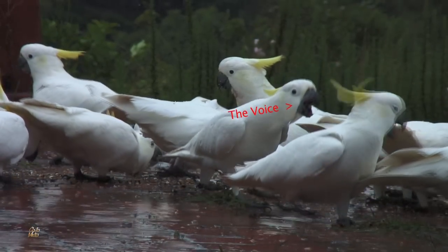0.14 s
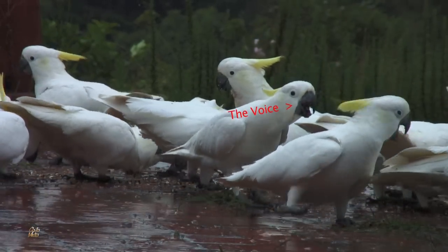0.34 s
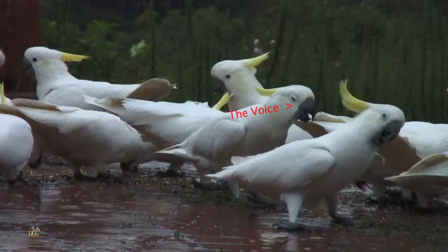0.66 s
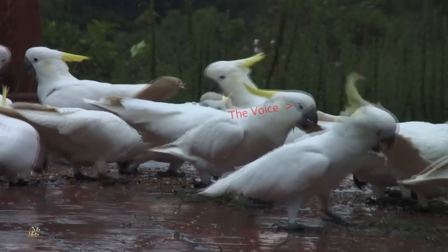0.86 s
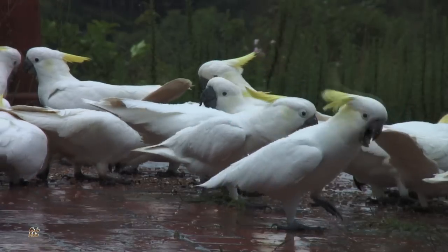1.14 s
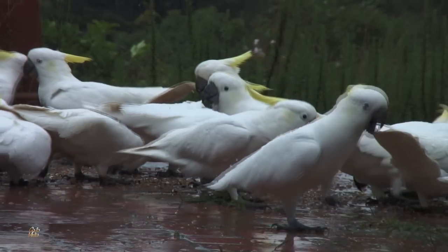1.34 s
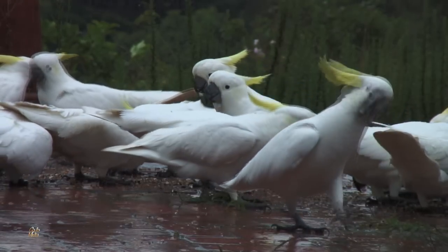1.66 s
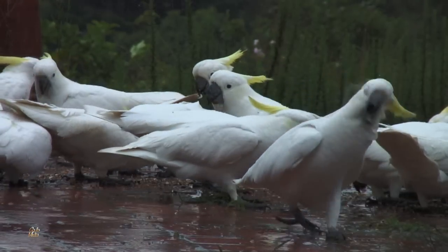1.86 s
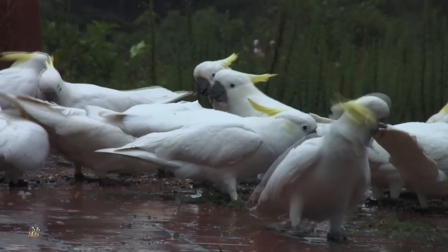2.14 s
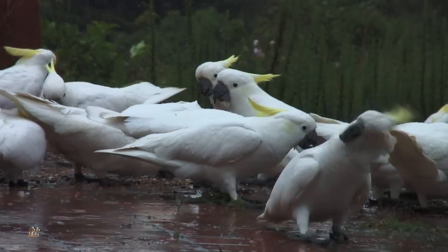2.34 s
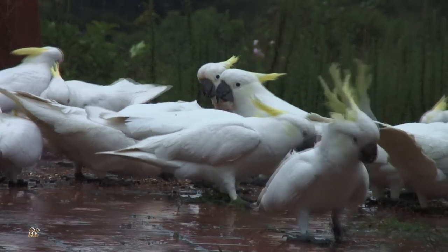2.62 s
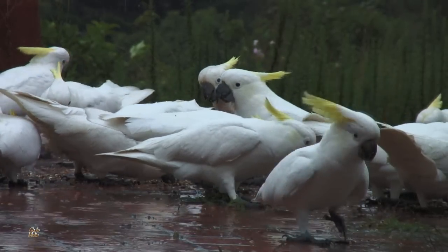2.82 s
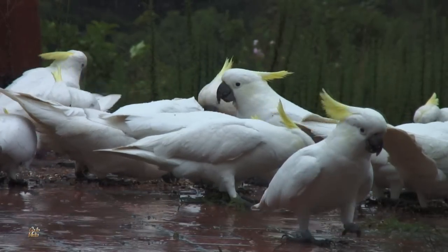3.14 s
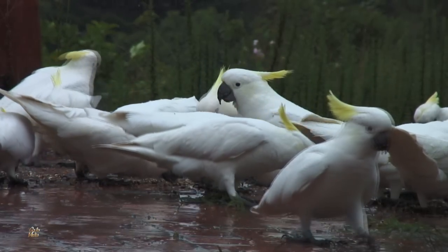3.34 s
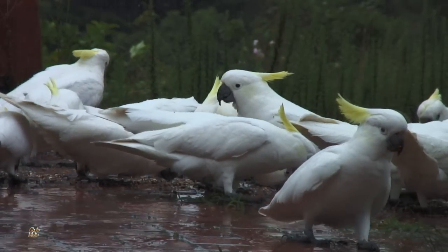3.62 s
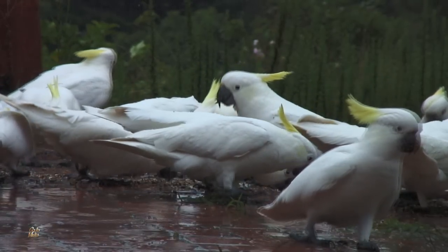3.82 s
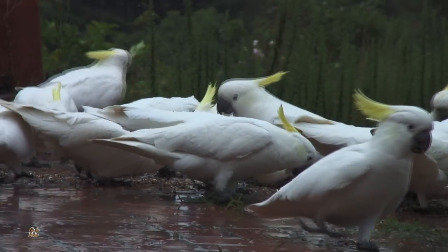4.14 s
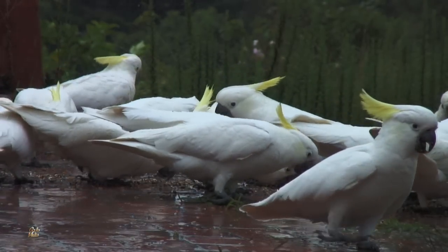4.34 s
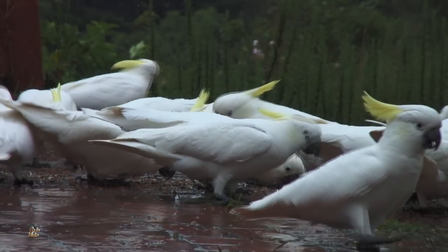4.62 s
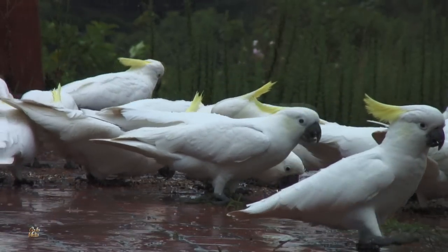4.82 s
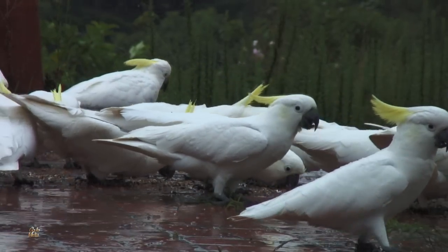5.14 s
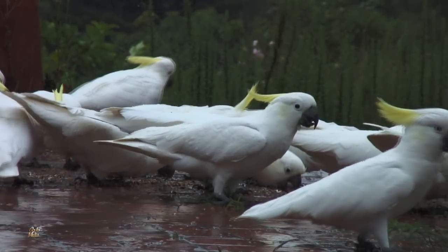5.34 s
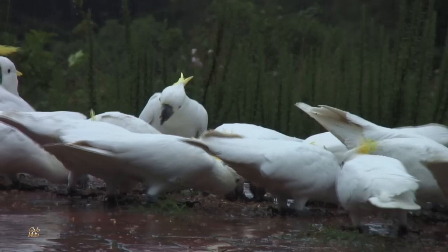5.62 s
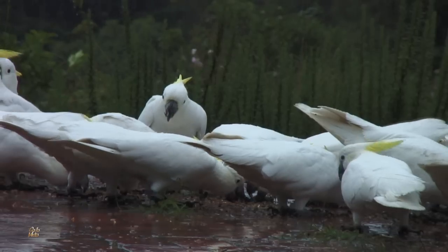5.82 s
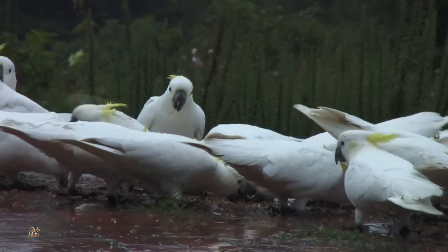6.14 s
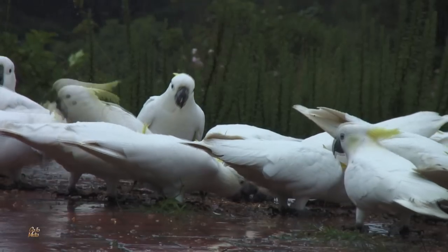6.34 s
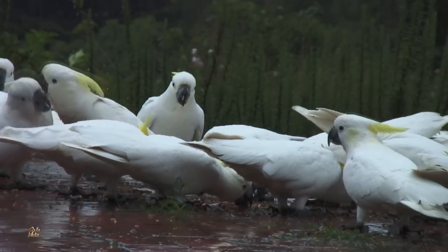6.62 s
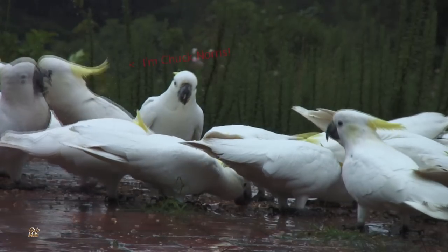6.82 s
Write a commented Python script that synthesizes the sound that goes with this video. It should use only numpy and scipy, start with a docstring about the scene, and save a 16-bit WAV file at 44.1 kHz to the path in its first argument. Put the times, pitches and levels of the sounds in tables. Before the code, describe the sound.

Harsh bursts of cockatoo screeching, squeals and thin whistles come thick at first, then sparser, over faint outdoor air and a low hum.

```python
"""Cockatoos squabbling over food

Cockatoos quarrel on wet paving in the centre; a second layer of cockatoos is heard in the left channel
only. Slapping membranes and gusts of air ring each bird's throat in a harsh rasp. In a squeal, a thin
whistle drops, breaks into a rattle and settles on a nasal note. Short peeps come in between, and low
thumps go with the loudest rasps. Behind them are faint whines, drips, outdoor hush and a low hum."""
import sys
import numpy as np
from scipy import signal
from scipy.fft import rfft, irfft, next_fast_len
from scipy.io import wavfile
from scipy.ndimage import uniform_filter1d

SR = 44100
rng = np.random.default_rng(int(sys.argv[2]) if len(sys.argv) > 2 else 0)


def transcribe(signal):
    """Save signal, clipped to [-1, 1], as a 16-bit WAV file at the path in sys.argv[1]."""
    frames = np.atleast_2d(signal).T
    limited = np.clip(frames, -1, 1)
    pcm = np.round(limited * 32767).astype(np.int16)
    wavfile.write(sys.argv[1], SR, pcm)


N = 307377
TIME = np.arange(N) / SR

# The tone colours of a rasp's body, its shrill band and outdoor air. Each row: frequency in Hz, level in dB.
BODY_COLOUR = [(70, -60.5), (210, -26), (450, -16), (750, -9), (1200, -9), (1560, -14), (1880, 0),
               (2780, -1), (3200, -10), (3800, -32), (6000, -80.5)]
SHRILL_COLOUR = [(1500, -31.5), (2700, -1), (3150, -10), (3480, 0), (3750, -1), (4050, -1), (4550, -5),
                 (5200, -14.5), (7000, -65.5)]
AIR_COLOUR = [(15, -60), (25, -33), (76, -28.5), (141, -15), (180, -13), (335, -6.5), (384, -7), (936, -6),
              (1020, -4.5), (1130, -2.5), (1230, -8), (1440, -6), (9570, -28), (14800, -36.5),
              (16000, -104)]


def amp(db):
    """Turns decibels into a number to multiply by."""
    return 10 ** (np.asarray(db) / 20)


def unit(x):
    """Scales a signal to an average strength (rms) of 1."""
    return x / np.sqrt(np.mean(x ** 2) + 1e-20)


def steady(x, size=1300):
    """Holds the strength of a voice at 1 while keeping its single pulses."""
    return x / np.sqrt(abs(uniform_filter1d(x ** 2, size)) + 1e-12)


def look_up(points, hz):
    """Reads between the rows of a frequency table, giving each octave equal room."""
    f, value = np.transpose(points)
    return np.interp(np.log(hz + 1), np.log(f + 1), value)


def add(mix, start_s, sound):
    """Mixes a sound in, with softened ends."""
    count = sound.shape[-1]
    softened = sound * signal.windows.tukey(count, min(1, 160 / count))
    part = mix[..., max(0, round(start_s * SR)):][..., :count]
    part += softened[..., :part.shape[-1]]


def wander(count, hz):
    """A smooth random wobble of strength 1, no faster than about hz."""
    size = next_fast_len(count + SR // 4)
    f = np.fft.rfftfreq(size, 1 / SR)
    spectrum = rfft(rng.standard_normal(size)) / (1 + (f / hz) ** 4)
    return unit(irfft(spectrum, size))[:count]


def colour(x, points, size=2048):
    """Filters a sound to follow a table of (Hz, dB), never ringing ahead of it."""
    log_gain = np.log(amp(look_up(points, abs(np.fft.fftfreq(size, 1 / SR)))))
    taps = np.fft.ifft(np.exp(np.conj(signal.hilbert(log_gain)))).real
    return signal.oaconvolve(x, taps[:size // 2])[:len(x)]


def resonate(x, hz, width_hz):
    """A resonance: lets through the sound near hz, which may move."""
    turn = np.exp(2j * np.pi * np.cumsum(hz * np.ones(len(x))) / SR)
    decay = np.exp(-np.pi * width_hz / SR)
    return 2 * (turn * signal.lfilter([1 - decay], [1, -decay], x / turn)).real


def envelope(length, attack_s, rise_db, release_db_per_s, change_db=0, arch_db=0):
    """A call rises, holds, then fades by 35 dB. Gives seconds, progress from 0 to 1, and level in dB."""
    t = np.arange(0, length + 35 / release_db_per_s, 1 / SR)
    progress = np.minimum(t / length, 1)
    attack = -rise_db * np.maximum(1 - t / attack_s, 0)
    hold = change_db * (progress - .5) + arch_db * (np.sin(np.pi * progress) - 2 / np.pi)
    return t, progress, attack + hold - release_db_per_s * np.maximum(t - length, 0)


def slaps(count, rate_hz, jitter, spread_db):
    """Uneven slaps of the membranes in a bird's voice box, as clicks."""
    turns = np.cumsum(rate_hz * np.exp(jitter * wander(count, rate_hz))) / SR
    return np.diff(np.floor(turns), prepend=-1) * amp(spread_db * wander(count, rate_hz))


def puffs(clicks, decay_s):
    """The gust of air that dies away after each slap."""
    return unit(signal.lfilter([1], [1, -np.exp(-1 / (decay_s * SR))], clicks))


def rasp(length, attack_s, effort_db, change_db, low_hz, main_hz, glide, tone_db, shrill_db, treble_db):
    """Slaps and gusts of air ring a throat whose resonances move with the beak and quaver."""
    # The colour of the treble. Each row: frequency in Hz, level in dB.
    treble_colour = [(3000, -7), (4400, 1), (5100, -3.5), (6100, 1.5), (7000, -9), (7800, -1), (8700, -15),
                     (9500, -3), (10400, -10.5), (11400, -7), (12400, -22), (13500, -23), (16000, -35)]
    t, progress, db = envelope(length, attack_s, rise_db=20, release_db_per_s=380,
                               change_db=change_db, arch_db=1.5)
    clicks = slaps(len(t), rate_hz=235, jitter=.45, spread_db=-.5)
    air = unit((puffs(clicks, decay_s=.0023) + 1) * rng.standard_normal(len(t)))  # 1 is a steady leak
    drive = unit(clicks) + amp(-1) * air
    slide = 1 + glide * (progress - .5)
    tuning = slide + .045 * wander(len(t), 33)
    body = colour(drive, BODY_COLOUR)
    body = (body + amp(8) * resonate(body, main_hz * tuning, 200)
            + amp(-4) * resonate(body, .7 * main_hz * tuning, 200))
    beak_shut = np.exp(-t / .04)  # until the beak opens, the rasp is throatier and duller
    tone = resonate(resonate(drive, low_hz * tuning, 140), low_hz * slide, 280)
    tone = amp(tone_db - 3.5 + 5 * beak_shut) * steady(tone)
    hiss = unit(clicks) + amp(4) * air  # higher up, the rushing air outweighs the slaps
    shrill = amp(shrill_db - 1) * steady(colour(hiss, SHRILL_COLOUR))
    build_db = 2.5 * (progress - .5) + 1.8 * wander(len(t), 40)  # the treble grows and flickers
    treble = amp(treble_db - 1 + build_db) * steady(colour(hiss, treble_colour))
    slack = amp(-.15 * db)  # as effort drops, the other parts gain on the body
    voice = steady(body, size=800) + slack * (tone + amp(-8 * beak_shut) * (shrill + treble))
    return amp(effort_db - 1 + db) * bounce(voice)


def bounce(x):
    """Quick echoes off the paving and nearby birds cut fine ripples into the tone colour."""
    # Each row: delay in seconds, gain.
    echoes = [(.0034, 0.11), (.0071, 0.18), (0.0122, -0.18)]
    return x + sum(gain * np.pad(x, (round(delay * SR), 0))[:len(x)] for delay, gain in echoes)


def squeal(length, attack_s, rattle_s, peak_db, change_db, settled_hz, piercing_db, release_db_per_s):
    """A nasal note: at first its pitch scatters and the membranes rattle, then it settles and clears."""
    # The throat's resonances. Each row: frequency in Hz, width in Hz, level in dB.
    throat = [(1393, 230, -5), (1680, 130, -6.5), (2660, 320, -1), (3223, 280, 3), (3500, 250, -8),
              (4810, 310, -11), (6020, 370, -22), (7850, 470, -23.5), (9370, 530, -24.5)]
    # Ripples in the treble. Each row: frequency in Hz, level in dB.
    ripples = [(4000, 0), (4500, -4), (5200, 1), (5900, -4), (6500, 0), (7200, -5), (7900, 0), (8700, -6),
               (9800, -2), (11500, -1), (13000, -6), (16000, -15)]
    t, _, db = envelope(length, attack_s, rise_db=12, release_db_per_s=release_db_per_s,
                        change_db=change_db, arch_db=-1.5)
    settled = .5 + .5 * np.tanh((t - rattle_s) / .018)
    rough = .85 - .75 * settled
    sag = .65 * np.maximum(rattle_s - t, 0)  # the pitch sinks into the note, then lifts a little
    lift = np.clip(.4 * (t - rattle_s), 0, .015)
    quaver = .009 * wander(len(t), 55.6)
    scatter = .086 * rough * wander(len(t), 397)
    turns = np.cumsum(settled_hz * (1 + sag + lift + quaver + scatter)) / SR
    note = unit(sum(np.cos(2 * np.pi * k * turns) for k in range(1, 23)))
    rattle = puffs(slaps(len(t), rate_hz=240, jitter=.43, spread_db=2.5), decay_s=.0025)
    breath = amp(-5) * rough * rng.standard_normal(len(t))
    drive = (note + breath) * (1 - rough + rough * rattle)
    beak = 1 + .035 * wander(len(t), 12)
    voice = np.zeros(len(t))
    for hz, width, gain_db in throat:
        ring = resonate(resonate(drive, hz * beak, 2 * width), hz * beak, 2 * width)
        voice += amp(gain_db + piercing_db * (3000 < hz < 4500)) * ring
    return amp(peak_db + db) * steady(colour(voice, ripples))


def thumps():
    """Uneven low bumps under the hardest rasps, mostly on the left."""
    # Each row: start in seconds, end in seconds, left level in dB, right level in dB relative to it.
    bursts = [(0, 0.36, -42, -28), (1.48, 1.575, -39.5, -8), (4.545, 4.622, -45, -11),
              (6.55, 6.78, -39.5, -10)]
    bass_colour = [(8, 7), (25, 0), (50, .5), (100, -11), (250, -15.5), (600, -47)]  # Hz, dB
    out = np.zeros((2, N))
    for start, end, db, right_db in bursts:
        count = len(np.arange(start, end, 1 / SR))
        bumps = colour(wander(count, 400), bass_colour, size=8192)
        bumps = unit(bumps * signal.windows.tukey(count, .25))
        add(out, start, amp([[db], [db + right_db]]) * bumps)
    return out


def hum(hz=150, trim_db=-1):
    """A low hum on one pitch, slowly changing in level."""
    # Each row: time in seconds, level in dB before the trim.
    levels = [(0, -58), (2.75, -55.5), (3.2, -60.5), (4.4, -65), (6.97, -62)]
    db = np.interp(TIME, *np.transpose(levels)) + trim_db
    return np.sqrt(2) * amp(db) * np.sin(2 * np.pi * hz * TIME)


def hush(air_db=-41.82, flock_db=-53, drips_db=-63, drips_per_s=120):
    """Outdoor air, far-off rasping birds and small drips on the paving."""
    air_gain = amp(air_db + .5 * wander(N, 12))
    air = unit(colour(rng.standard_normal(N), AIR_COLOUR, size=8192))
    far_birds = np.zeros(N)
    for hz in (880, 1120, 2400):
        band = resonate(rng.standard_normal(N), hz * (1 + .2 * wander(N, 16)), 240)
        far_birds += resonate(band, hz, 500) * amp(1.6 * wander(N, 12))
    landings = rng.random(N) < drips_per_s / SR
    drops = landings * amp(3 * np.minimum(rng.exponential(1, N), 3))
    drips = colour(drops, [(300, -21), (1500, -29), (4000, 50), (10000, -51), (16000, -32)])
    return air_gain * air + amp(flock_db) * unit(far_birds) + amp(drips_db) * unit(drips)


def left_hush(rasping_db=-5):
    """The second layer's background: air and farther birds rasping, gone after about 4 seconds."""
    # Each row: time in seconds, level of the air in dB.
    levels = [(0, -46.5), (.85, -39.5), (1.1, -60), (2.2, -41.5), (2.7, -48.5), (3.5, -44), (3.75, -59),
              (4.2, -112)]
    air = unit(colour(rng.standard_normal(N), AIR_COLOUR, size=8192))
    body = colour(rng.standard_normal(N) * amp(3.8 * wander(N, 120)), BODY_COLOUR)
    shrill = colour(rng.standard_normal(N), SHRILL_COLOUR)
    return amp(np.interp(TIME, *np.transpose(levels))) * (air + amp(rasping_db) * unit(body + shrill))


def whistle(hz, db, overtone_db, firm_db=-20):
    """A gliding tone with weak overtones, shaky when blown softly and pure when blown hard."""
    shaky = 1 / (1 + amp(db - firm_db) ** 2)
    phase = 2 * np.pi * np.cumsum(hz * (1 + .017 * shaky * wander(len(hz), 215))) / SR
    tone = sum(amp(k * overtone_db) * np.sin((k + 1) * phase) for k in range(4))
    flutter_db = 3 * shaky * wander(len(hz), 86)
    return np.sqrt(2) * amp(db + flutter_db) * tone


def swoop(hold_s, drop_s, held_hz, held_db, drop_db, sag_hz_per_s=1400, break_hz=3060, surge_s=.008):
    """A thin whistle sags and swells, then surges and drops to the pitch where the voice breaks."""
    t = np.arange(0, hold_s + drop_s, 1 / SR)
    to_go, since = np.maximum(hold_s - t, 0), np.maximum(t - hold_s, 0)
    hz = held_hz + sag_hz_per_s * to_go + (break_hz - held_hz) * (since / drop_s) ** .7
    db = held_db - 6 * to_go / hold_s + (drop_db - held_db) * np.minimum(since / surge_s, 1)
    return whistle(hz, db, overtone_db=-33)


def peep(length, peak_db, change_db, start_hz, middle_hz, end_hz, overtone_db):
    """A short whistle whose pitch follows one smooth arc."""
    _, progress, db = envelope(length, attack_s=.006, rise_db=10, release_db_per_s=2000,
                               change_db=change_db, arch_db=3)
    arc = np.polyfit([0, .5, 1], [start_hz, middle_hz, end_hz], 2)
    return whistle(np.polyval(arc, progress), peak_db + db, overtone_db)


def whine(length, peak_db, base_hz, upturn):
    """A thin, reedy call from the back of the flock, turning up and swelling at its end."""
    # The level of each harmonic in dB, lowest first.
    harmonics = [1.5, -5, 0, -1.5, -7, -22]
    t, progress, db = envelope(length, attack_s=.025, rise_db=12, release_db_per_s=1500)
    lift = upturn * progress ** 5
    phase = 2 * np.pi * np.cumsum(base_hz * (1 + lift + .0051 * wander(len(t), 90))) / SR
    reed = unit(sum(amp(level) * np.sin(k * phase) for k, level in enumerate(harmonics, 1)))
    flutter_db = 2.5 * wander(len(t), 27)
    return amp(peak_db + db + 50 * lift + flutter_db) * reed


def yard(x, echo_db=-15):
    """Adds scattered echoes from paving, wall and trees; the high treble dies first."""
    # Each row: frequency in Hz, seconds the echoes take to fade by 60 dB.
    fade_times = [(200, 0.21), (1000, 0.32), (3000, 0.4), (8000, 0.2), (15000, 0.05)]
    count = SR * 3 // 4
    echoes = rng.standard_normal(count) * (rng.random(count) < 2000 / SR)
    echoes *= np.arange(count) > .006 * SR  # none in the first 6 ms
    hz, t, bands = signal.stft(echoes, SR, nperseg=256)
    fade = amp(-60 * t / look_up(fade_times, hz)[:, None])
    tail = signal.istft(bands * fade, SR, nperseg=256)[1]
    return x + amp(echo_db) * signal.fftconvolve(x, tail / np.linalg.norm(tail))[:N]


def flock(layer, lowest_hz=150):
    """All calls of one layer, "ahead" (the centre) or "left", with echoes; small throats give no bass."""
    # Each row: layer; start, length and rise time in seconds; effort and its change in dB; low and main
    # resonance in Hz; their glide as a fraction; settings in dB for throaty tone, shrill band and treble.
    rasps = [ ("left", 0, .325, .005, -14.5, -1, 970, 2370, -.1, -21, -8.5, -11.5),
             ("ahead", 0, .105, .012, -20, 0, 1180, 2560, 0, -8, -4, -10.5),
             ("ahead", .565, .065, .022, -25, 1, 1040, 2430, -.02, -5, -4, -15),
             ("ahead", .615, .09, .028, -17, -2, 960, 2650, -.15, -13, -7, -13),
             ("left", .615, .095, .03, -27, -1, 900, 2650, -.03, -10, -2, -14),
             ("ahead", .913, .365, .023, -18.3, -1.5, 890, 2580, .09, -11, -7, -16),
             ("ahead", 1.293, .262, .037, -15.5, -.5, 1060, 2310, .02, -8, -4, -13.5),
             ("left", 1.32, .06, .035, -24, 2, 1020, 2330, .03, -3, -9, -21),
             ("left", 1.365, .1, .04, -17, -3, 980, 2750, -.08, -11, -7, -12),
             ("ahead", 1.55, .195, .02, -22, -2, 1120, 2560, .05, -7, -4, -20),
             ("left", 1.672, .345, .032, -17.5, -2, 860, 2560, .06, -11, -7.5, -15.5),
             ("ahead", 1.755, .06, .02, -28, -4, 900, 1900, -.04, -4, -5, -10),
             ("ahead", 1.86, .07, .03, -28, -2, 1150, 2400, -.05, -9, -1, -13),
             ("ahead", 1.95, .075, .027, -23, -1, 930, 2000, .02, -3, -5, -11),
             ("left", 2.025, .09, .02, -25, 2, 1030, 2300, .05, -2, -1, -10),
             ("left", 2.22, .315, .06, -22.5, 1, 1110, 2560, .1, -3.5, -4, -20),
             ("ahead", 2.27, .15, .06, -38, 0, 1100, 2450, 0, 4, -4, -13),
             ("ahead", 2.54, .075, .03, -30.5, 1, 900, 2030, -.03, -3, -1, -11),
             ("ahead", 2.62, .1, .02, -38, -.5, 900, 1900, .03, 3, -2, -11),
             ("ahead", 4.495, .203, .03, -15.5, -2.5, 990, 2270, .08, -12, -6, -15),
             ("ahead", 5.495, .06, .02, -28, -1.5, 1230, 2300, .02, -11, -3, -27),
             ("ahead", 6.45, .305, .035, -15, -.5, 990, 2300, -.06, -12.5, -8, -9.5),
             ("ahead", 6.78, .033, .02, -28, -1, 850, 1950, -.02, -4, -1, -12), ]
    # Each row: layer; start, length, rise time and rattle time in seconds; level and its change in dB;
    # settled pitch in Hz; boost of the piercing band in dB; fade in dB per second.
    squeals = [ ("ahead", 0, .105, .012, .16, -25, 1, 590, -4, 450),
               ("left", .423, .112, .012, .078, -17.5, 3, 652, -1, 420),
               ("ahead", 2.54, .055, .012, .012, -33, 1, 715, -2, 500),
               ("ahead", 2.742, .143, .007, .108, -22.5, 5.5, 641, 0, 950),
               ("ahead", 3.03, .24, .04, .27, -37.5, -1, 590, -4, 200),
               ("ahead", 3.28, .16, .025, .085, -28.5, -8, 614, -7, 230),
               ("ahead", 5.484, .07, .03, .058, -25.5, 0, 587, -2, 600),
               ("ahead", 6.336, .141, .007, .096, -17.8, 5.5, 636, 2, 700), ]
    # Whistles leading into squeals. Each row: layer; start, hold and drop time in seconds;
    # held pitch in Hz; held level and level in the drop in dB.
    swoops = [ ("left", .35, .05, .023, 4090, -34, -15), ("ahead", 2.65, .051, .024, 4080, -42, -20),
              ("ahead", 3.205, .035, .055, 4200, -40, -39), ("ahead", 6.243, .077, .019, 3930, -31.5, -14),
              ]
    # Each row: layer; start and length in seconds; level and its change in dB; first, middle and last
    # pitch in Hz; step from each harmonic to the next in dB.
    peeps = [ ("ahead", 1.82, .055, -34, 1, 3690, 4130, 4300, -25),
             ("ahead", 2.723, .026, -30, -1, 2610, 2540, 2450, -20),
             ("ahead", 2.722, .026, -31, -3, 5230, 5060, 4900, -30),
             ("ahead", 2.885, .14, -37, -14, 2620, 2370, 2330, -15),
             ("ahead", 3.05, .105, -35.5, -1, 2560, 2190, 2420, -15),
             ("ahead", 3.055, .115, -44.5, 1, 4080, 4480, 4700, -30),
             ("ahead", 3.28, .09, -32, -5, 2760, 2530, 2490, -17),
             ("ahead", 3.36, .34, -46, -22, 2480, 2455, 2450, -12),
             ("ahead", 5.479, .1, -35, -5, 2440, 2320, 2350, -21),
             ("ahead", 6.05, .09, -35.5, 9, 1975, 2020, 2190, -9),
             ("ahead", 6.133, .04, -36, -15, 3030, 3500, 3800, -27),
             ("ahead", 6.138, .07, -41, -10, 2250, 2610, 2460, -14), ]
    # Each row: layer, start and length in seconds, level in dB, pitch in Hz, upturn as a fraction.
    whines = [("ahead", 3.79, .192, -45, 972, .135), ("ahead", 4.25, .09, -50, 950, .01)]
    birds = np.zeros(N)
    for voice, calls in (rasp, rasps), (squeal, squeals), (swoop, swoops), (peep, peeps), (whine, whines):
        for call_layer, start, *call in calls:
            if call_layer == layer:
                add(birds, start, voice(*call))
    bass_cut = signal.butter(2, lowest_hz, "high", fs=SR, output="sos")
    return yard(signal.sosfilt(bass_cut, birds))


def scene():
    """The centre cockatoos are alike in both channels; the second layer is in the left channel only."""
    centre = flock("ahead") + hum() + hush()
    second_layer = flock("left") + left_hush()
    return np.array([centre + second_layer, centre]) + thumps()


def record(dry, ceiling=.93, highest_hz=15750):
    """Rounds off the tallest peaks, then cuts the very top of the treble."""
    rounded = dry / (1 + (dry / ceiling) ** 4) ** (1 / 4)
    treble_cut = signal.firwin(511, highest_hz, window=("kaiser", 9), fs=SR)
    return signal.oaconvolve(rounded, treble_cut[None], "same")


dry = scene()
out = record(dry)
transcribe(out)
```